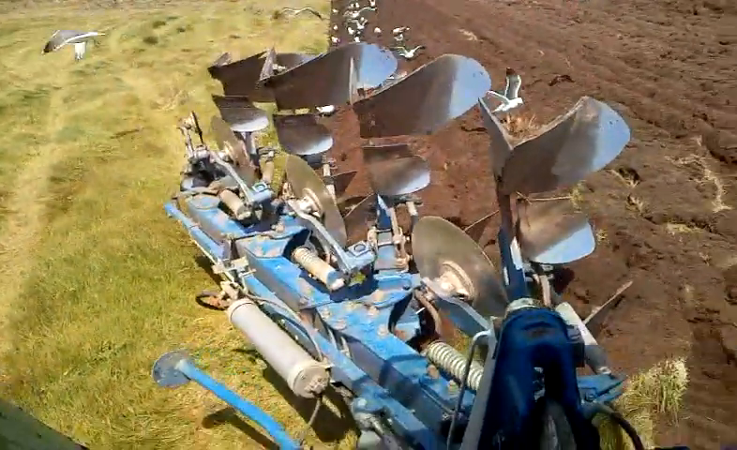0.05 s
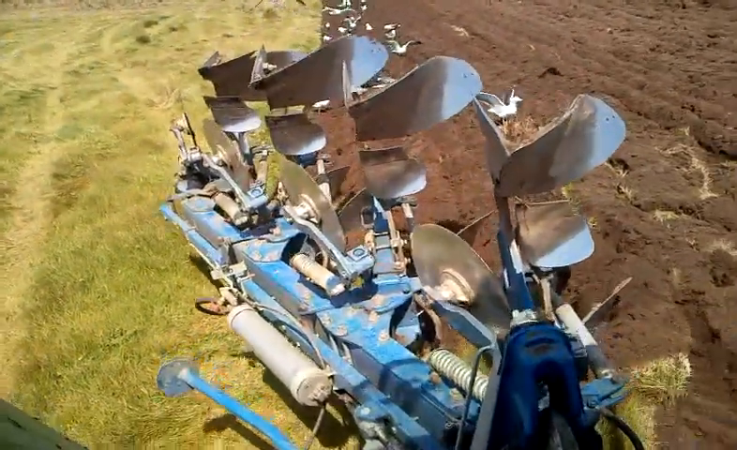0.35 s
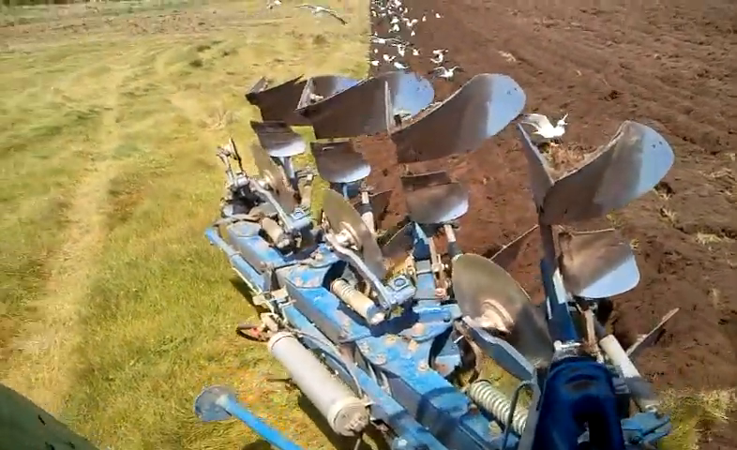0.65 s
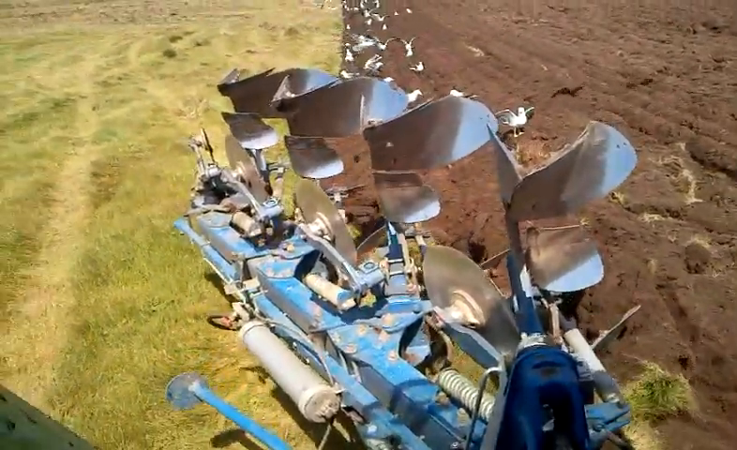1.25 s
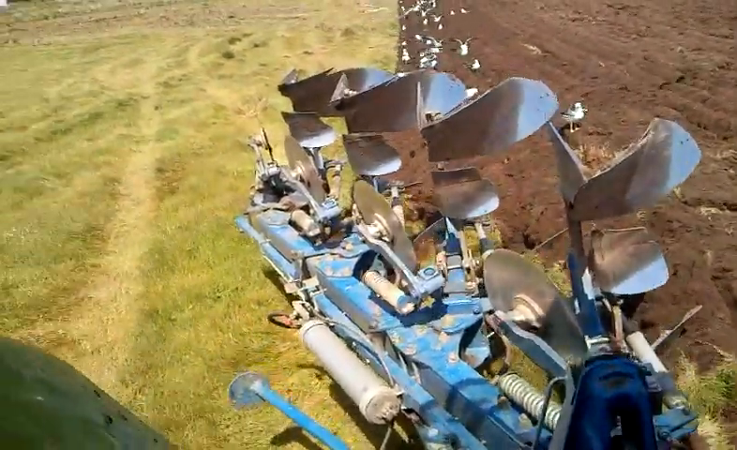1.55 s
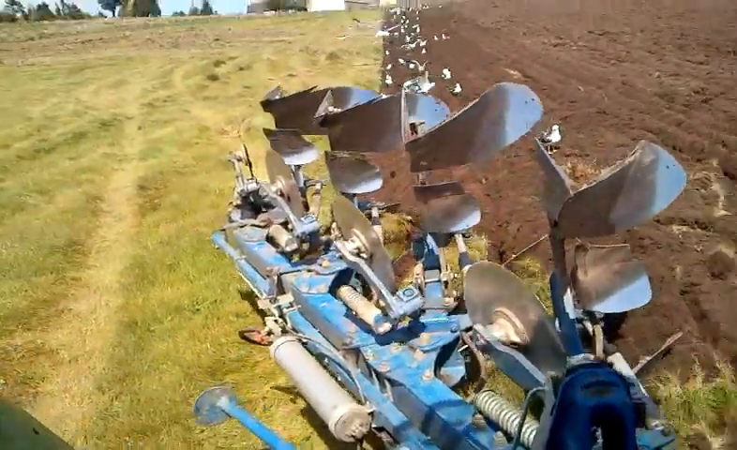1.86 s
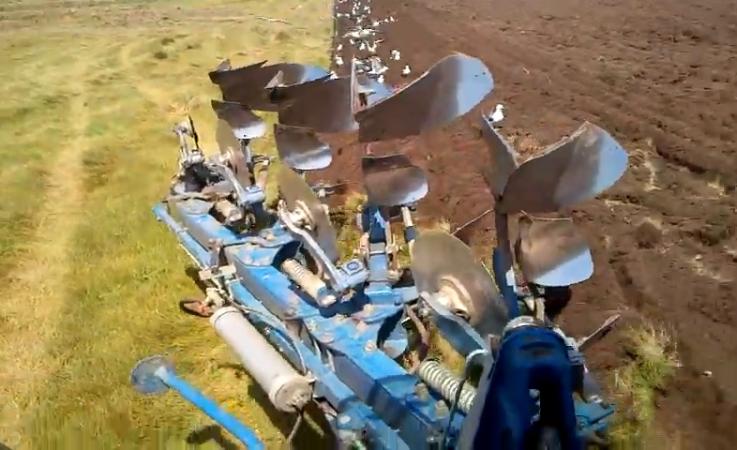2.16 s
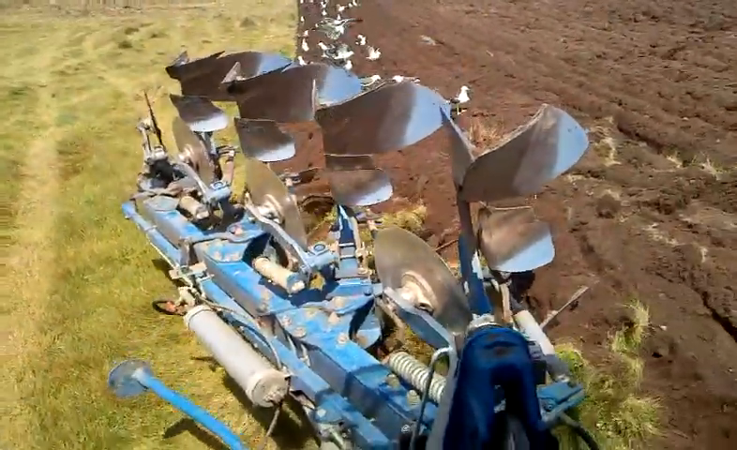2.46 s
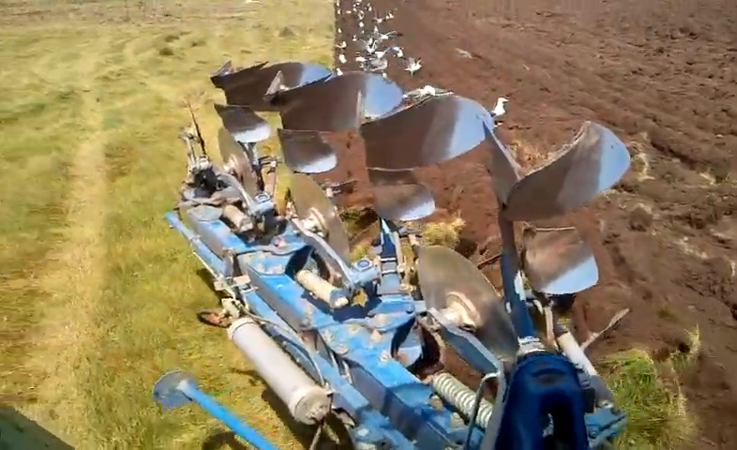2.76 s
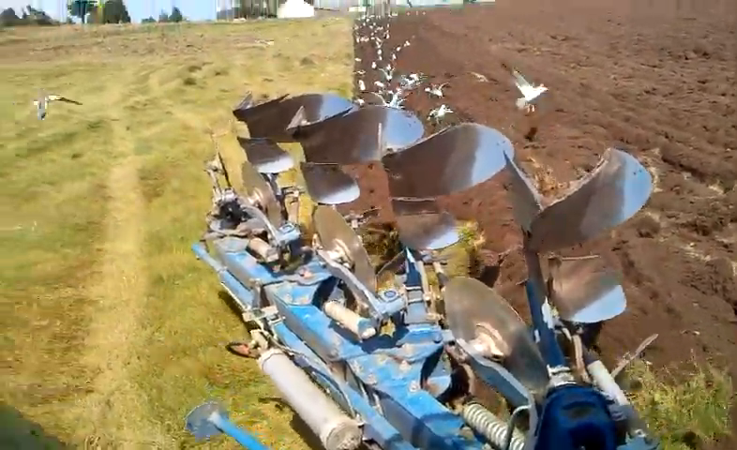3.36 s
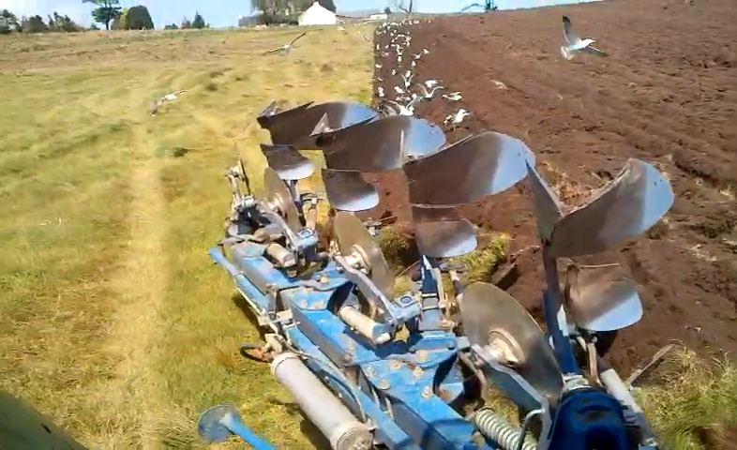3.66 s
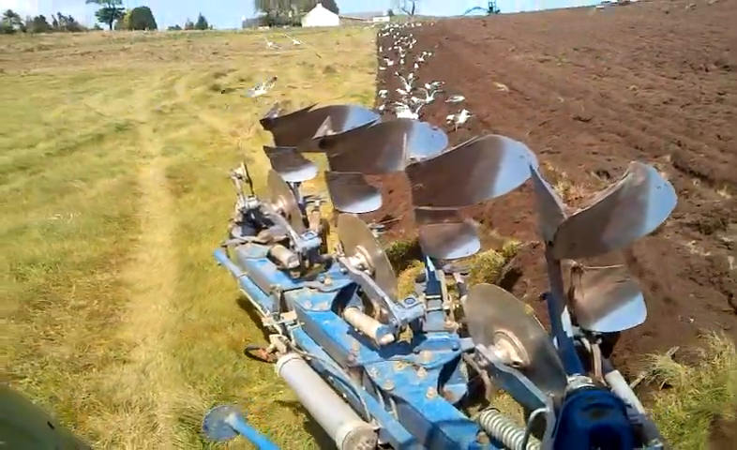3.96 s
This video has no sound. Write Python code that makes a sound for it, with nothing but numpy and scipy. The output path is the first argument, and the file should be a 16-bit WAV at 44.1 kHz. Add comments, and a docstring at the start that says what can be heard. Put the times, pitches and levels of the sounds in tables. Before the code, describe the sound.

A plough scrapes through stony soil over a steady tractor drone and rumble, heard from the cab with little treble. Stones knock in a quick run until 0.6 seconds, then more sparsely. From about 1.8 to 2.2 seconds come the loudest clanks, with ringing steel and short squeals. Afterwards the scraping eases, with faint squeals and a small knock near 3.7 seconds. A faint, thin whistle wavers throughout.

```python
"""Stones knock and grind on a plough over the drone of a six-cylinder tractor, heard from the cab.
Engine firings and the ride shake the cab into a rumble. Soil, gravel and pebbles scrape along the
steel boards, which ring; the steel squeals against stones, and a thin whistle runs throughout.
The microphone passes little treble and overloads on the hardest blows."""
import sys
import numpy as np
from scipy import signal
from scipy.fft import rfft, irfft
from scipy.io import wavfile
from scipy.ndimage import uniform_filter1d

SR = 44100
rng = np.random.default_rng(int(sys.argv[2]) if len(sys.argv) > 2 else 0)


def to_wav(sig):
    """Store sig (one row per channel, or 1-D mono) as 16-bit WAV at the path in sys.argv[1].

    Samples outside -1..1 are clipped; the rate is SR.
    """
    pcm = np.clip(np.atleast_2d(sig), -1, 1) * 32767
    pcm = np.round(pcm).astype(np.int16)
    wavfile.write(sys.argv[1], SR, pcm.T)  # frames by channels


N = 176400
TIME = np.arange(N) / SR
GRAINS_PER_S, FLUTTER_DB = 3500, 3.5

# Modes of the steel boards. Each row: frequency in Hz, relative level in dB, T60 in seconds.
STEEL_MODES = [(625, 1.5, 0.11), (908, 1, 0.35), (1192, -2.5, 0.31), (1260, 0, 0.6), (1311, -4, 0.12),
               (1607, -7, 0.15), (1808, -7, .15), (1956, 2.5, 0.17), (2130, -6, 0.12), (2290, -8.5, .15),
               (2500, -9, 0.22), (3180, -2, 0.035)]
# Spectrum of sliding soil. Each row: frequency in Hz, relative density in dB.
SOIL_SPECTRUM = [(250, -7), (500, -1.5), (740, -2.5), (930, 5), (1300, 0.5), (1550, -1.5), (2000, 2),
                 (2700, -10), (3100, -4), (3700, -12)]


def tractor(cylinders=6, waver_db=3, firing_spread_db=4, noise_share=0.93):
    """Engine orders drone; uneven firings and noise shake the cab; all swell with the ride."""
    # Each row: time in seconds, firings per second.
    engine_speed = [(0, 80), (.5, 79.2), (.7, 81.3), (1.05, 88), (1.35, 84), (1.55, 88.6), (1.9, 84),
                    (2.35, 83), (2.7, 86), (2.95, 84), (3.3, 88.3), (3.65, 87.4), (4, 87)]
    # Each row: multiple of the full engine cycle rate, level in dB.
    orders = [(6, -38), (8, -39.5), (20, -35.5), (21, -35.5), (22, -30.5), (26, -42.5), (30, -39.5)]
    # Each row: frequency in Hz, width in Hz, level in dB.
    cab_modes = [(104.4, 12, -36), (174, 61, -35.5), (205, 110, -43.5), (301, 40, -30.5), (410, 53, -49.5)]
    # Each row: frequency in Hz, relative density in dB.
    rumble_spectrum = [(30, -12), (60, -28), (90, 2.5), (140, 1.5), (250, 3.5), (350, -6.5), (500, -14),
                       (900, -5), (1400, -21.5), (3000, -18.5)]
    # Each row: time in seconds, gain in dB.
    ride_swell = [(0, 2.5), (.6, 4.5), (.8, 1), (1.5, 4), (1.75, 3.5), (2.2, 4.5), (2.4, -0.5), (3.2, 0.5),
                  (3.7, -1), (4, -2)]
    firings = np.cumsum(in_time(engine_speed)) / SR
    tones = 0
    for order, db in orders:
        amplitude = np.sqrt(2) * from_db(db + waver_db * drift(3))
        tones += amplitude * np.sin(2 * np.pi * (order * firings / cylinders + rng.random()))
    cylinder_db = rng.normal(0, firing_spread_db, cylinders)[firings.astype(int) % cylinders]
    strength = from_db(cylinder_db + firing_spread_db * drift(21))
    pulses = rms_one(np.diff(np.floor(firings), prepend=0) * strength)
    shake = np.sqrt(1 - noise_share) * pulses + np.sqrt(noise_share) * rng.standard_normal(N)
    cab = sum(from_db(db) * rms_one(resonate(shake, hz, width_hz)) for hz, width_hz, db in cab_modes)
    cab = signal.sosfilt(signal.butter(2, [70, 700], "band", fs=SR, output="sos"), cab)
    rumble = from_db(-28.5 + 3.1 * drift(6.3)) * colour(rng.standard_normal(N), rumble_spectrum)
    ride_db = in_time(ride_swell)
    return from_db(0.45 * ride_db) * tones + from_db(ride_db) * (cab + rumble)


def stones(contacts_per_s=4000, ring_db=-22.5):
    """Each stone is a burst of contacts: the frame thuds, the boards clunk, loose steel jangles."""
    # Each row: start in seconds, length in seconds, then thud, clunk and jangle levels in dB.
    knocks = [(.003, 0.04, -20, -19, -21.5), (0.046, 0.021, -18.5, -29, -18.5),
              (0.079, 0.034, -15, -22, -20), (0.219, 0.025, -19.5, -30.5, -27),
              (0.263, 0.028, -16.5, -22.5, -36), (0.299, 0.014, -16, -11, -14.5),
              (0.421, 0.016, -17, -16.5, -22), (.517, 0.015, -14.5, -20, -19),
              (0.537, 0.044, -11.5, -15, -21), (0.893, 0.01, -19.5, -22, -42),
              (1.047, 0.012, -23, -21, -26), (1.141, 0.034, -18.5, -43, -28.5),
              (1.367, .015, -13.5, -14.5, -29), (1.394, 0.0061, -23, -18.5, -23),
              (1.799, 0.027, -31, -17, -19.5), (1.867, 0.016, -20.5, -19, -12),
              (1.896, 0.061, -22, -18.5, -14), (1.939, 0.05, -17.5, -12.5, -5.5),
              (1.994, .026, -19.5, -16.5, -9), (2.034, 0.029, -17, -15.5, -12),
              (2.122, 0.055, -22, -22, -16), (2.196, 0.0069, -18, -29, -24), (2.233, 0.018, -27, -29, -19),
              (2.536, 0.0065, -40, -20, -23.5), (3.683, 0.0085, -25, -20, -24)]
    # Three spectra. Each row: frequency in Hz, relative density in dB.
    thud = [(30, -27.5), (65, -19), (105, -0.5), (185, 1), (280, -4), (400, -25)]
    clunk = [(290, 2.5), (450, 1.5), (620, -1), (740, -1), (920, -2), (1240, 2.5), (1400, -7)]
    jangle = [(1400, -0.5), (1600, -4), (1950, 1.5), (2200, 3), (2800, -6), (3120, 2), (3600, -8.5)]
    starts_s, lengths_s, thud_db, clunk_db, jangle_db = np.transpose(knocks)
    out = np.zeros(N)
    for spectrum, levels_db, release_s, rings in (
            (thud, thud_db, 0.0079, False), (clunk, clunk_db, 0.01, True), (jangle, jangle_db, 0.01, True)):
        pushes = [from_db(db) * push(start_s, length_s, release_s)
                  for start_s, length_s, db in zip(starts_s, lengths_s, levels_db)]
        burst = np.max(pushes, axis=0) * steady(colour(grains(contacts_per_s), spectrum))
        out += burst
        if rings:
            out += from_db(ring_db) * boards(burst)
    return out


def squeals(jitter=0.014, edge_s=0.0068, clear_above_db=-15.5, rough_per_db=0.6):
    """Steel sticks and slips on stones: gliding tones, clear under hard pressure, rough under light. The two
    low glides near 200 Hz are the frame groaning under the blow."""
    # Each row: start in seconds, length in seconds, start and end pitch in Hz, level in dB.
    slips = [(0.561, 0.056, 916, 933, -25.5), (0.879, 0.19, 990, 1046, -31.5),
             (1.388, .03, 2140, 2130, -22.5), (1.455, 0.062, 1990, 1850, -30.5),
             (1.5, 0.083, 1690, 1600, -31), (1.871, 0.021, 1631, 1560, -9.5),
             (1.88, 0.032, 2160, 2130, -19.5), (1.892, 0.038, 1383, 1293, -14),
             (1.963, 0.032, 1330, 1232, -6), (1.96, 0.0316, 205, 222.4, -5), (2.006, .064, 225, 139.8, -9),
             (2.037, 0.055, 1181, 1126, -15), (2.129, 0.053, 1311, 1347, -16),
             (2.289, 0.095, 1890, 1950, -29), (2.372, 0.073, 1940, 1977, -21.5),
             (2.425, 0.027, 1315, 1310, -22.5), (2.561, 0.36, 1219, 1214, -34.5),
             (3.185, .16, 790, 925, -33)]
    out = np.zeros(N)
    waver = 1 + jitter * drift(90)
    flutter = from_db(FLUTTER_DB * drift(45))
    chatter = drift(70) + 1j * drift(70)
    for start_s, length_s, start_hz, end_hz, db in slips:
        span = (TIME > start_s) & (TIME < start_s + length_s)
        t = TIME[span] - start_s
        hz = (start_hz + (end_hz - start_hz) * t / length_s) * waver[span]
        edges = np.clip(np.minimum(t, length_s - t) / edge_s, 0, 1)
        rough = np.clip((clear_above_db - db) * rough_per_db, 0, 1)
        grip = np.sqrt(2 * (1 - rough)) + np.sqrt(rough) * chatter[span]
        out[span] += from_db(db) * edges * np.real(grip * np.exp(2j * np.pi * np.cumsum(hz) / SR))
    return out * flutter


def soil(surge_db=1.84, ring_db=-11.5, clink_db=-4.5):
    """Grit and pebbles slide over the boards in uneven surges; the grit sets the steel ringing."""
    # Each row: time in seconds, level in dB.
    scrape_level = [(0, -23.5), (.14, -21.5), (.21, -25), (.65, -27.5), (.85, -25.5), (1.1, -32),
                    (1.28, -26), (1.5, -30), (1.77, -27), (1.9, -21.5), (2.2, -21), (2.45, -24),
                    (2.65, -30.5), (2.83, -29), (2.95, -31.5), (3.1, -29), (3.4, -35), (3.58, -31.5),
                    (3.77, -33), (4, -31.5)]
    flow = from_db(in_time(scrape_level) + surge_db * drift(20))
    grit = flow * grains(GRAINS_PER_S)
    clinks = from_db(clink_db) * flow * pebbles()
    return colour(grit, SOIL_SPECTRUM) + from_db(ring_db) * boards(grit) + clinks


def boards(force):
    """The plough's steel boards ring in their modes."""
    ring = sum((-1) ** k * from_db(db) * resonate(force, hz, np.log(1000) / np.pi / t60_s)
               for k, (hz, db, t60_s) in enumerate(STEEL_MODES))
    return ring / np.sqrt(sum(from_db(db) ** 2 for _, db, _ in STEEL_MODES))


def pebbles(pitch_count=60, clinks_per_s=130, t60_s=0.073):
    """Pebbles clink in the soil, each briefly at a pitch of its own; unit power."""
    hits = grains(clinks_per_s)
    pitch_index = rng.integers(0, pitch_count, N)
    pitches_hz = np.geomspace(STEEL_MODES[0][0], STEEL_MODES[-1][0], pitch_count)
    gains = from_db(np.interp(pitches_hz, *np.transpose(SOIL_SPECTRUM)))
    width_hz = np.log(1000) / np.pi / t60_s
    return rms_one(sum(gains[k] * resonate(hits * (pitch_index == k), hz, width_hz)
                       for k, hz in enumerate(pitches_hz)))


def gravel(width_hz=520):
    """Patches of gravel rasp along the boards, each a bright band that swells and fades."""
    # Each row: start in seconds, length in seconds, centre in Hz, peak level in dB.
    patches = [(-.08, 0.28, 3200, -24), (0.749, .16, 2900, -27.5), (0.999, 0.04, 2250, -26),
               (2.109, 0.098, 3080, -21), (2.747, .13, 2600, -34)]
    grit = grains(GRAINS_PER_S)
    out = np.zeros(N)
    for start_s, length_s, hz, db in patches:
        swell = np.sin(np.pi * np.clip((TIME - start_s) / length_s, 0, 1))
        out += from_db(db) * swell * resonate(grit, hz, width_hz)
    return out


def whistle(centre_hz=1950, wander=0.009, jitter=0.013):
    """A thin, wavering tone, likely a rubbing disc."""
    # Each row: time in seconds, level in dB.
    whistle_level = [(0, -36.5), (2.2, -40), (2.7, -34), (3.3, -42), (3.55, -34), (3.7, -43), (4, -40.5)]
    hz = centre_hz * (1 + wander * drift(3) + jitter * drift(70))
    amplitude = np.sqrt(2) * from_db(in_time(whistle_level) + FLUTTER_DB * drift(25))
    return amplitude * np.sin(2 * np.pi * np.cumsum(hz) / SR)


def grains(per_s, spread_db=1.5):
    """Random tiny contacts of uneven size; unit power."""
    sizes = from_db(spread_db * np.minimum(rng.exponential(1, N), 4)) * rng.choice([-1, 1], N)
    return rms_one(sizes * (rng.random(N) < per_s / SR))


def push(start_s, length_s, release_s, attack_s=0.004):
    """Contact envelope: quick rise, hold, exponential release."""
    rise = np.clip((TIME - start_s) / attack_s + 0.5, 0, 1)
    return rise * np.exp(-np.maximum(TIME - start_s - length_s, 0) / release_s)


def steady(x, window_s=0.012):
    """Even out chance swells to unit power."""
    return x / np.sqrt(uniform_filter1d(x ** 2, size=int(window_s * SR)) + 1e-6)


def resonate(x, hz, width_hz):
    """One resonance that keeps the power of a white input."""
    r = np.exp(-np.pi * width_hz / SR)
    numerator = np.sqrt((1 - r * r) / 2) * np.array([1, 0, -1])
    return signal.lfilter(numerator, [1, -2 * r * np.cos(2 * np.pi * hz / SR), r * r], x + 1e-18)


def colour(x, spectrum, skirt_db_per_octave=18):
    """Give a white signal a spectrum and keep its power."""
    hz, db = np.transpose(spectrum)
    octave = np.log2(np.fft.rfftfreq(2 * N, 1 / SR) + 1)
    outside = np.abs(octave - np.clip(octave, np.log2(hz[0]), np.log2(hz[-1])))
    gain = from_db(np.interp(octave, np.log2(hz), db) - skirt_db_per_octave * outside)
    return irfft(rfft(x, 2 * N) * rms_one(gain))[:N]


def drift(rate_hz, hop=40, warmup=2000):
    """Smooth random curve of unit spread, changing about rate_hz times a second."""
    r = np.exp(-2 * np.pi * rate_hz * hop / SR)
    noise = rng.standard_normal(N // hop + warmup + 2)
    slow = signal.lfilter([1], [1, -2 * r, r * r], noise)[warmup:]
    return np.interp(np.arange(N) / hop, np.arange(len(slow)), rms_one(slow))


def in_time(rows):
    """Interpolate (seconds, value) rows at every sample."""
    return np.interp(TIME, *np.transpose(rows))


def from_db(db):
    """Decibels to gain."""
    return 10 ** (np.asarray(db) / 20)


def rms_one(x):
    """Scale to unit power."""
    return x / np.sqrt(np.mean(x ** 2) + 1e-20)


def scene():
    """Tractor and plough, mono."""
    return (tractor() + soil() + gravel() + stones() + squeals() + whistle())[None]


def record(dry, low_hz=39.4, top_hz=3223, stop_hz=5050, clip_level=0.67, cutoff_hz=16100):
    """A narrow-band microphone, hard overload, then a final low-pass."""
    x = signal.sosfilt(signal.butter(2, low_hz, "high", fs=SR, output="sos"), dry)
    x = signal.sosfilt(signal.butter(8, top_hz, fs=SR, output="sos"), x)
    x = signal.sosfilt(signal.cheby2(12, 60, stop_hz, fs=SR, output="sos"), x)
    x = np.clip(x, -clip_level, clip_level)
    return signal.sosfilt(signal.cheby2(16, 60, cutoff_hz, fs=SR, output="sos"), x)


dry = scene()
out = record(dry)
to_wav(out)
```